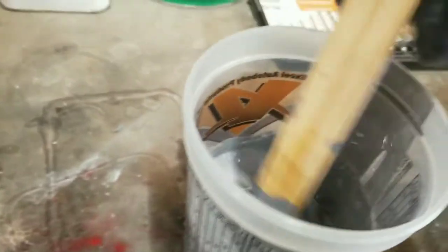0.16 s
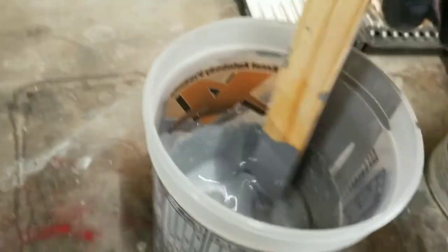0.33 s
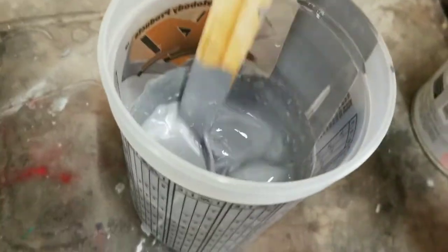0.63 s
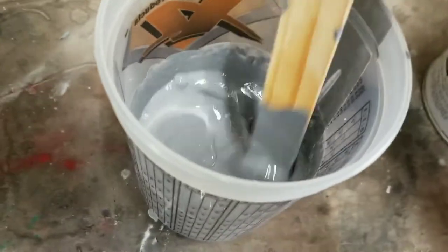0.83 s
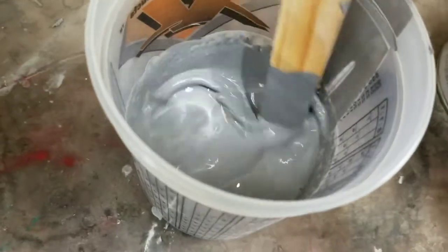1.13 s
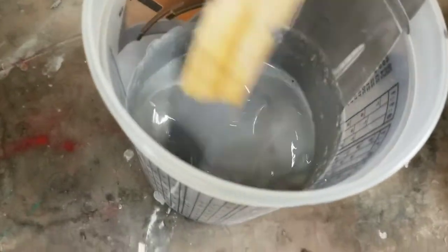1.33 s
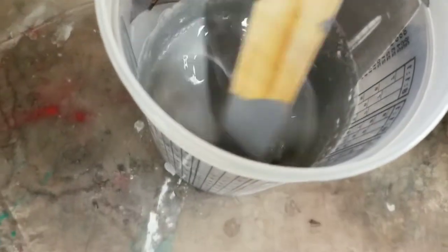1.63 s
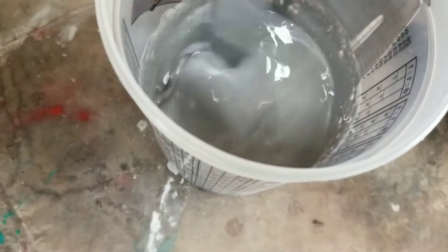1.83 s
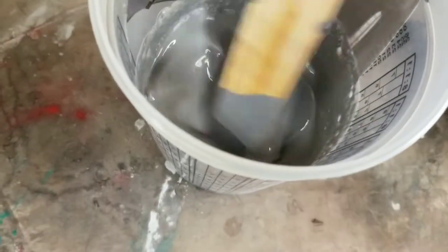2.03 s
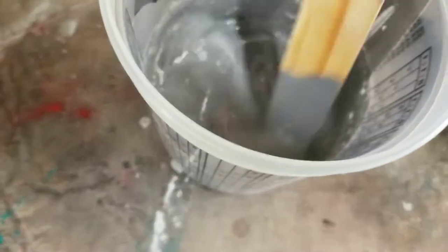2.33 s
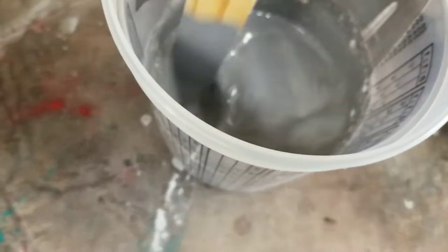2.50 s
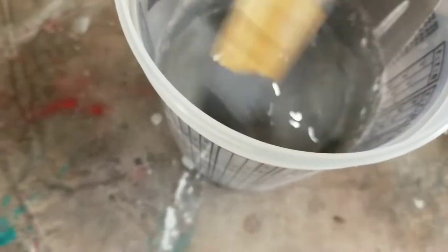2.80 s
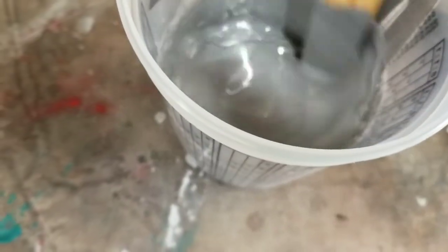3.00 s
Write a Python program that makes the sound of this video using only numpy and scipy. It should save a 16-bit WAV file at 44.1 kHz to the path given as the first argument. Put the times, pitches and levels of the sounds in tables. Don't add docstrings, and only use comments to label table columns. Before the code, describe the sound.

A wooden stick stirs thick paint in a plastic cup, close and left, over low workshop hum and faint hiss. Soft drag and scraping start immediately; hollow knocks with short rings come at 0.1, 0.35 and 0.7 s, a hard one at 1.1, bright tick at 1.57, paired knocks at 2.3 and 2.67, hardest at 2.96, then a last scrape and tick near 3.07.

```python
import sys
import numpy as np
from scipy import signal
from scipy.fft import rfft, irfft
from scipy.io import wavfile
from scipy.ndimage import uniform_filter1d

SR = 44100
rng = np.random.default_rng(int(sys.argv[2]) if len(sys.argv) > 2 else 0)


def natural_amplitude(level_db):
    exponent = np.asarray(level_db, float) / 20
    return 10 ** exponent


def to_wav(sig):
    pcm = np.clip(np.atleast_2d(sig), -1, 1) * 32767
    pcm = np.round(pcm).astype(np.int16)
    wavfile.write(sys.argv[1], SR, pcm.T)


N = 138915

# (frequency [Hz], level [dB per Hz])
SHOP_HISS = [(18, -37.5), (30, -17.5), (71, -2.5), (93, -9), (174, -29), (913, -49), (4190, -41.5),
             (8740, -57), (16000, -35.5)]
# (frequency [Hz], width [Hz], level [dB])
MACHINE_HUM = [(40.4, 15, -69.5), (93.4, 25, -76)]
# (time [s], level [dB])
PAINT_DRAG = [(0, -64), (0.251, -79.5), (.45, -80), (.7, -68.5), (.95, -68.5), (1.2, -65.5), (1.331, -80.5),
              (1.45, -86), (1.7, -63), (1.82, -84.5), (1.93, -70.5), (2.1, -77), (2.3, -74), (2.4, -67),
              (2.55, -73), (2.78, -72), (3.15, -58.5)]
# (frequency [Hz], width [Hz], level [dB])
PAINT_COLOUR = [(310, 520, 4.5), (1030, 1900, 9.5), (2360, 2650, 6.5), (6700, 2200, 4), (13300, 3500, 9)]
# (start [s], length [s], fine hiss [dB], body above it [dB])
SCRAPE_EVENTS = [(-.02, 0.12, -69, -2), (0.332, 0.044, -68, -6), (0.47, 0.065, -65.5, 3),
                 (0.873, 0.018, -53, -6), (0.9, 0.0086, -54.5, -10), (1.051, 0.059, -63, -5.5),
                 (1.106, 0.048, -62, -4), (1.46, 0.037, -71.5, -9.5), (1.57, 0.012, -63.5, -12),
                 (1.64, 0.22, -81, -24), (1.85, 0.059, -66.5, -5.5), (2.21, 0.045, -67.5, -9),
                 (2.267, 0.052, -70, 7), (2.405, 0.24, -78.5, -10), (2.579, 0.062, -63, -8),
                 (2.927, 0.015, -52.5, 2), (2.955, 0.0099, -54, 9), (3.067, 0.11, -66.5, -1)]
# (frequency [Hz], width [Hz], level [dB])
SCRAPE_BODY = [(860, 620, -9.5), (2100, 470, 1), (3100, 980, 6.5), (4750, 410, -0.5)]
SCRAPE_FINE = [(6500, 2800, -2.5), (10530, 1060, -8), (13720, 1820, -2.5), (14750, 2000, -1)]
# (time [s], level [dB], pitch [Hz], snap above it [dB])
TICKS = [(0.1491, -39.5, 1910, -32), (0.1575, -41.5, 2230, -12), (0.632, -44.5, 4440, 0),
         (0.7677, -56, 1190, -23), (0.8026, -39, 3520, -15), (0.8614, -44.5, 3710, -1.5),
         (0.8784, -35, 2170, -34), (0.9018, -51.5, 5320, 11.5), (1.0425, -44, 4100, -1),
         (1.069, -39.5, 1840, -28), (1.0834, -51, 2970, 6), (1.2256, -42, 3100, -14),
         (1.484, -53.5, 3000, 0), (1.5668, -21.5, 3910, -18), (1.6102, -49, 1340, -8.5),
         (1.6462, -33.5, 1295, -15.5), (2.0014, -45, 3490, -41.5), (2.0712, -61.5, 1330, -19),
         (2.5556, -44.5, 4580, -0.5), (2.5895, -65.5, 5940, 14.5), (2.9064, -44.5, 4300, -3),
         (2.9143, -28.5, 3960, -9), (2.9254, -36, 5500, -3), (2.9347, -22, 1910, -18),
         (3.0187, -25.5, 5700, -14), (3.0779, -41, 2100, -25), (.1575, -52.5, 674, -28),
         (.879, -47, 944, -30), (.879, -43, 1700, -24), (.904, -54.5, 920, -30),
         (1.6462, -54, 672, -23), (1.6462, -34.5, 1710, -33), (2.0014, -54, 910, -30),
         (2.0014, -48, 2640, -32), (2.556, -68, 1070, -30), (2.556, -54, 2000, -30),
         (2.592, -64, 780, -25), (2.70, -55, 940, -30), (2.735, -53, 1720, -8), (2.9143, -60, 684, -30),
         (2.9143, -39, 3390, -30), (2.9143, -35, 4360, -30), (2.934, -37, 906, -30),
         (3.0779, -47.5, 840, -30), (2.503, -63, 650, -30), (2.52, -60, 660, -30),
         (3.02, -53, 640, -30), (.768, -54, 2200, -25), (1.086, -48.5, 910, -32),
         (.9045, -47.5, 2600, 6.5), (3.0779, -50, 2660, -30)]
# (time [s], cup ring [dB], stick above ring [dB], crack above ring [dB], thump [dB])
WALL_KNOCKS = [(0.084, -41, -32, -3.5, -53.5), (0.26, -45.5, -1, -6, -56), (0.344, -31.5, -0.5, -47, -42),
               (0.6601, -42.5, 3, 2, -57), (0.748, -34.5, -1, -3.5, -59.5), (0.976, -45.5, -4, -0.5, -54),
               (1.112, -24, -7.5, -4, -44), (1.462, -40, -21, -16.5, -54), (1.568, -33, 0, -4.5, -49),
               (1.6796, -34.5, -3.5, -24.5, -59.5), (1.951, -39.5, -2, -11, -59),
               (2.281, -31, 3.5, -0.5, -52), (2.298, -35.5, -8.5, -26, -64), (2.431, -39, 1, -14.5, -53.5),
               (2.67, -30.5, -4.5, -9.5, -71.5), (2.681, -36.5, -1, -48, -50), (2.802, -59.5, -10, -1, -74),
               (2.814, -37.5, 3, -13, -58.5), (2.958, -23, -13, -5.5, -49.5), (3.048, -55.5, -22, -20, -73)]
# (wall pitch [Hz], wall t60 [s], overtone [Hz], overtone [Hz], overtones above ring [dB])
KNOCK_SPOTS = [(672, 0.079, 930, 1518, -4.5), (640, .065, 1380, 2150, -10), (647, .05, 506, 2720, -12.5),
               (643, 0.066, 1000, 2560, -10), (640, 0.067, 2040, 2971, -13.5), (665, .06, 963, 1920, -2),
               (634, 0.073, 1800, 3052, -10), (749, 0.059, 506, 1700, -19), (670, 0.064, 248, 2800, -2.5),
               (657, 0.047, 220, 4200, -6.5), (665, 0.079, 844, 800, -19.5), (636, 0.04, 920, 2169, -7),
               (630, 0.056, 2400, 2110, -8), (666, 0.054, 861, 1798, -10.5), (656, 0.043, 3400, 3800, -10),
               (700, 0.039, 1600, 320, -6), (640, 0.04, 1800, 3000, -1), (640, 0.047, 254, 1022, -7.5),
               (627, 0.071, 1800, 2131, -4), (640, 0.077, 320, 1800, -5)]
# (frequency [Hz], level [dB], t60 [s])
CUP_MODES = [(480, -20, .05), (643, 0, .075), (575, -14, .05), (740, -15, .035), (920, -15, .035)]
STICK_MODES = [(1300, -8, .018), (1513, -4, .025), (1687, 0, .022), (1900, 2, .022), (2142, 3, .03)]
EDGE_MODES = [(3010, 4, .016), (3800, 8, .012), (4350, -6, .012), (5900, -20, .01)]
PAINT_MODES = [(79.3, -4.5, .18), (156.4, 3, 0.032), (223.3, 2, 0.063), (370, -19, 0.039)]
# (frequency [Hz], width [Hz], level [dB])
TAIL_COLOUR = [(253, 340, 0.5), (693, 390, -3.5), (1460, 1870, 3), (3040, 1400, -12.5), (6800, 3400, -15.5)]
RUMBLE_COLOUR = [(186, 124, 5), (285.4, 163, 0), (476.4, 180, -5), (650, 118, -3.5), (853, 192, -8.5)]
# (frequency [Hz], left lead [rad])
LEFT_LEAD = [(0, 0.51), (1640, 1.1), (2400, 7.46), (9000, 9.94), (16000, 19.1)]
# (frequency [Hz], left above right [dB])
LEFT_EXCESS = [(100, 5), (300, 6), (640, 10), (1200, 5), (2000, 10), (15000, 9)]


def band(x, hz, width_hz):
    low_hz = max(hz - width_hz / 2, 10)
    high_hz = min(hz + width_hz / 2, SR / 2.2)
    return signal.sosfilt(signal.butter(2, [low_hz, high_hz], "band", fs=SR, output="sos"), x)


def highpass(x, hz):
    return signal.sosfilt(signal.butter(2, hz, "high", fs=SR, output="sos"), x)


def unit(x):
    return x / np.sqrt(np.mean(x ** 2))


def add(out, s, x):
    i = max(int(s * SR), 0)
    out[:, i:i + x.shape[-1]] += x[..., :N - i]


def swell(t, rise_s):
    return 1 - np.exp(-t / rise_s)


def decay(t, t60_s):
    return 1000 ** (-t / t60_s)


def log_curve(f, table):
    hz, db = np.array(table).T
    return np.interp(np.log(f), np.log(hz), db)


def pair(n):
    alike = 0.3
    a, b = rng.standard_normal((2, n))
    return np.array([a, alike * a + np.sqrt(1 - alike ** 2) * b])


def colour(x, table):
    return unit(sum(natural_amplitude(db) * unit(band(x, hz, width)) for hz, width, db in table))


def flutter(rate, db):
    k = int(SR / rate)
    steps = np.repeat(rng.standard_normal(N // 8), k)[:N + SR]
    return natural_amplitude(db * uniform_filter1d(steps, k))


def shop():
    f = np.arange(N // 2 + 1) * SR / N + 1
    mid, side = rfft(rng.standard_normal((2, N))) * natural_amplitude(log_curve(f, SHOP_HISS))
    side = side * np.clip(f / 900, .5, 1)
    hiss = irfft(np.array([mid + side, mid - side]), N)
    hum = sum(natural_amplitude(db) * unit(band(rng.standard_normal(N), hz, width)) for hz, width, db in MACHINE_HUM)
    left_right_db = np.array([[1.6], [-1.6]])
    return (natural_amplitude(-59.5) * unit(hiss) + hum) * natural_amplitude(left_right_db)


def paint():
    s, db = np.array(PAINT_DRAG).T
    drag = natural_amplitude(np.interp(np.arange(N) / SR, s, db) + 4)
    return colour(pair(N) * flutter(23.19, 0.83)[:N], PAINT_COLOUR) * drag


def scrapes():
    grit = pair(N) * flutter(900, 4.5)[:N]
    slip_per_s, slip_db = 160, 2.8
    body = colour(grit, SCRAPE_BODY) * flutter(slip_per_s, slip_db)[:N]
    fine = colour(grit, SCRAPE_FINE) * flutter(slip_per_s, slip_db)[:N]
    out, t = np.zeros((2, N)), np.arange(N) / SR
    for s, length, db, body_db in SCRAPE_EVENTS:
        stroke = np.sin(np.pi * np.clip((t - s) / length, 0, 1)) ** 1.8
        out += stroke * natural_amplitude(db + 12.5) * (fine + natural_amplitude(body_db) * body)
    return out


def ticks(crack, snap):
    out, t = np.zeros((2, N)), np.arange(SR // 10) / SR
    for s, db, hz, snap_db in TICKS:
        at = slice(int(s * SR), int(s * SR) + len(t))
        fade_s = np.clip(18.5 / 3 / hz, .0013, .004)
        tone = np.sin(2 * np.pi * hz * t) + natural_amplitude(-18.5) * np.sin(2 * np.pi * hz * 1.2 * t)
        burst = natural_amplitude(-6) * unit(band(crack[:, at] + snap[:, at], hz, hz * .5))
        burst = burst + natural_amplitude(snap_db + 0.5) * snap[:, at]
        after = natural_amplitude(-24.5) * crack[:, at] * np.exp(-t / 0.006)
        tick = tone * np.exp(-t / fade_s) + burst * np.exp(-t / .002) + after
        add(out, s, natural_amplitude(db + 2.5) * swell(t, .0004) * tick)
    return out


def ring(modes, t, chance):
    out = 0
    for (hz, db, t60), (strength, detune) in zip(modes, chance):
        out = out + natural_amplitude(db + 2.5 * strength) * np.sin(2 * np.pi * hz * (1 + .03 * detune) * t) * decay(t, t60)
    return out


def chatter(count):
    c = rng.standard_normal((count, 2, SR // 250))
    return c[:, :1] + .5 * c * np.array([[0], [1]])


def push(x, chance):
    contact_s = .0011
    force = chance * np.exp(-np.arange(chance.shape[-1]) / (contact_s * SR))
    force = force / np.sqrt(np.sum(force ** 2, axis=1, keepdims=True))
    return signal.fftconvolve(x * np.ones((2, 1)), force, axes=1)[:, :len(x)]


def wall(t, chance, hz, t60, low_hz, high_hz, over_db):
    usual_hz, usual_t60_s = 643, .075
    modes = [(f * hz / usual_hz, db, d * t60 / usual_t60_s) for f, db, d in CUP_MODES]
    over = 0
    for f in (low_hz, high_hz):
        over_t60_s = 45 / max(f, 1700)
        over = over + np.sin(2 * np.pi * f * t) * decay(t, over_t60_s)
    return (ring(modes, t, chance) + natural_amplitude(over_db + 8) * over) * swell(t, .0007)


def knocks(crack, snap, tail, rumble):
    out, low, t = np.zeros((2, N)), np.zeros((2, N)), np.arange(SR // 2) / SR
    u = t / .00011 - 4
    click = -u * np.exp(-u ** 2 / 2)
    count = len(WALL_KNOCKS)
    chances = rng.standard_normal((count, 4, 5, 2))
    for knock, spot, c, force in zip(WALL_KNOCKS, KNOCK_SPOTS, chances, chatter(count)):
        s, db, stick_db, edge_db, thump_db = knock
        at = slice(int(s * SR), int(s * SR) + len(t))
        burst = natural_amplitude(edge_db + 4) * crack[:, at] + natural_amplitude(edge_db - 13) * snap[:, at]
        wood = natural_amplitude(stick_db - 9) * ring(STICK_MODES, t, c[1]) + natural_amplitude(edge_db - 8) * ring(EDGE_MODES, t, c[2])
        cup = wall(t, .4 * c[0] * [1, 0], *spot)
        hit = push(wood, force) + cup + natural_amplitude(stick_db - 5) * click
        after = natural_amplitude(-17) * tail[:, at] * swell(t, 0.0013) * decay(t, 0.16)
        add(out, s, natural_amplitude(db + 1) * (hit + burst * np.exp(-t / 0.0015) + after))
        add(low, s, natural_amplitude(thump_db - 2.5) * rumble[:, at] * swell(t, 0.011) * decay(t, 0.47))
        add(low, s, natural_amplitude(thump_db + 10.5) * ring(PAINT_MODES, t, c[3]) * swell(t, .012))
    return highpass(out, 210) + low


def scene():
    crack = unit(band(pair(N + SR), 2660, 4450))
    snap = unit(band(pair(N + SR), 10360, 8000))
    tail = colour(pair(N + SR) * flutter(150, -1), TAIL_COLOUR)
    rumble = colour(pair(N + SR) * flutter(40, 4.4), RUMBLE_COLOUR)
    left, right = paint() + scrapes() + ticks(crack, snap) + knocks(crack, snap, tail, rumble)
    f = np.arange(N // 2 + 1) * SR / N + 1
    lag = np.exp(-1j * np.interp(f, *np.array(LEFT_LEAD).T))
    right = irfft(rfft(right) * natural_amplitude(-log_curve(f, LEFT_EXCESS)) * lag, N)
    return shop() + natural_amplitude(3) * np.array([left, right])


def low_pass(x):
    return signal.sosfilt(signal.butter(12, 16990, fs=SR, output="sos"), x)


def record(dry):
    top_cut = signal.ellip(8, .2, 24, 15900, fs=SR, output="sos")
    mix = signal.sosfilt(top_cut, dry)
    return low_pass(mix)


dry = scene()
out = record(dry)
to_wav(out)
```